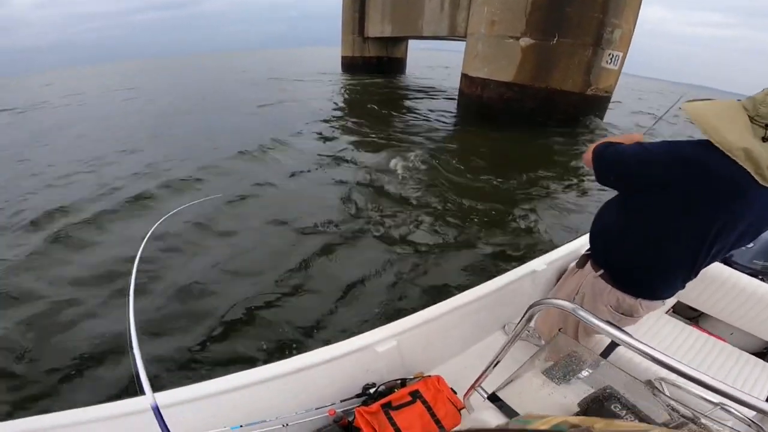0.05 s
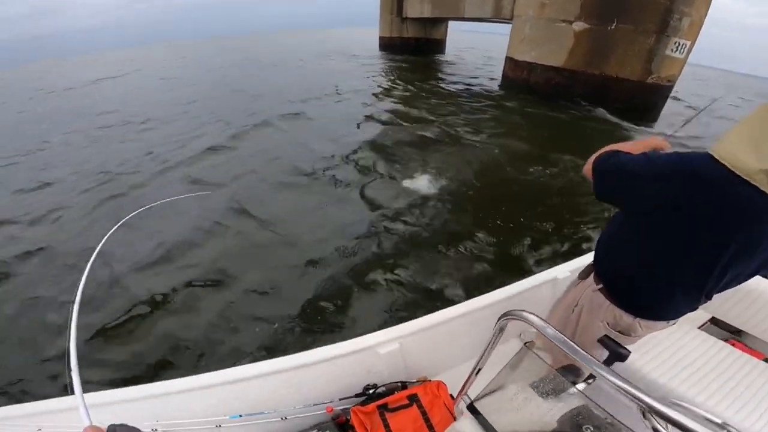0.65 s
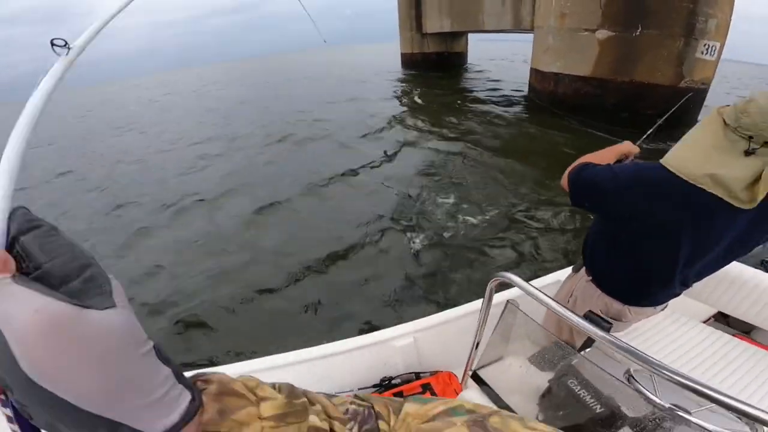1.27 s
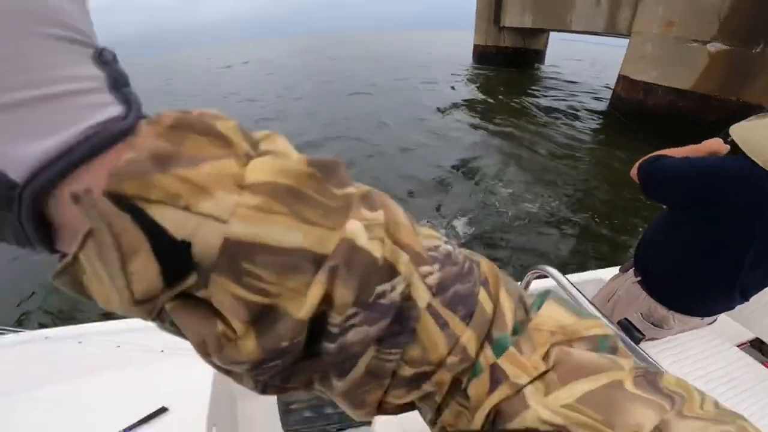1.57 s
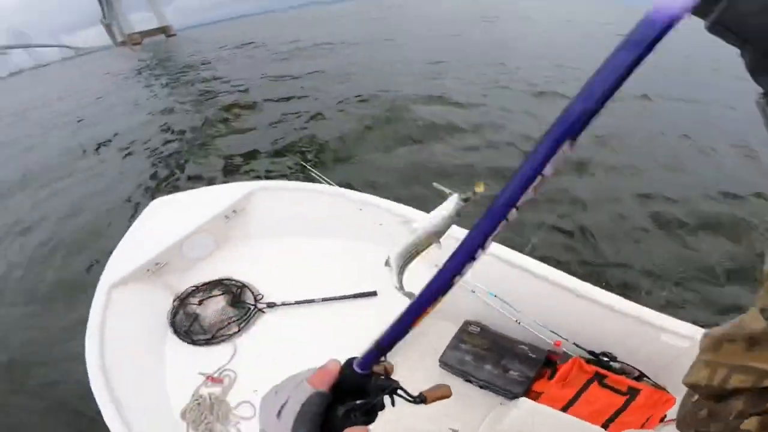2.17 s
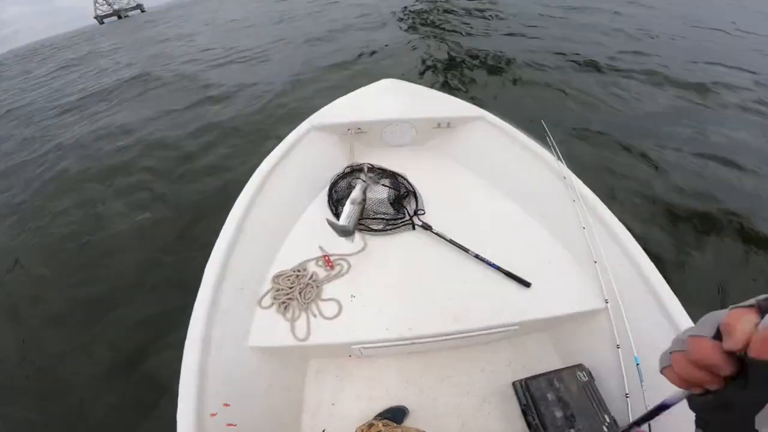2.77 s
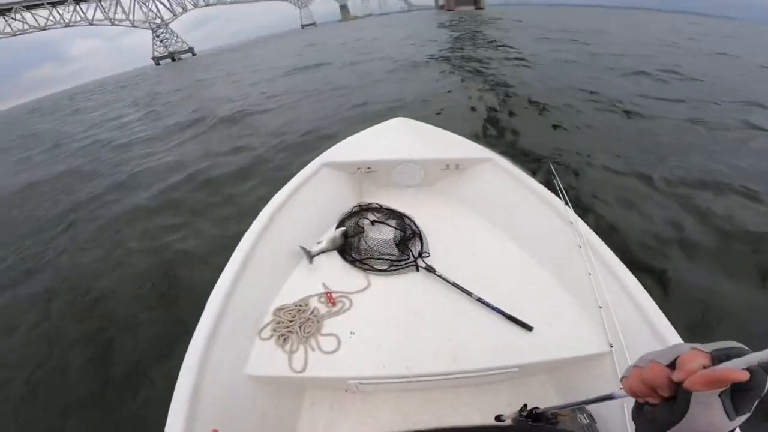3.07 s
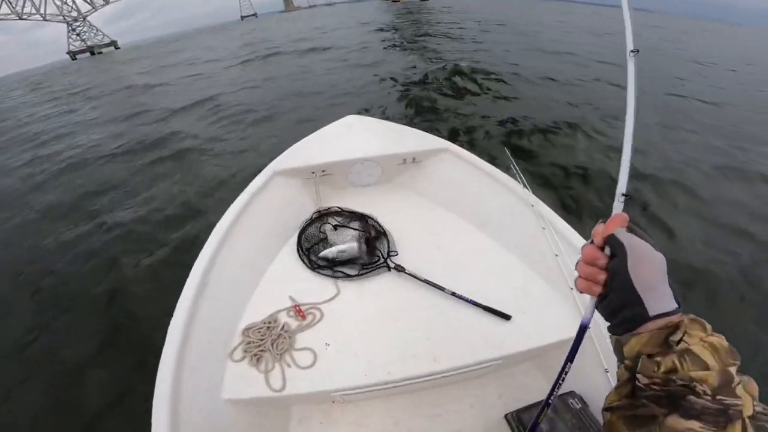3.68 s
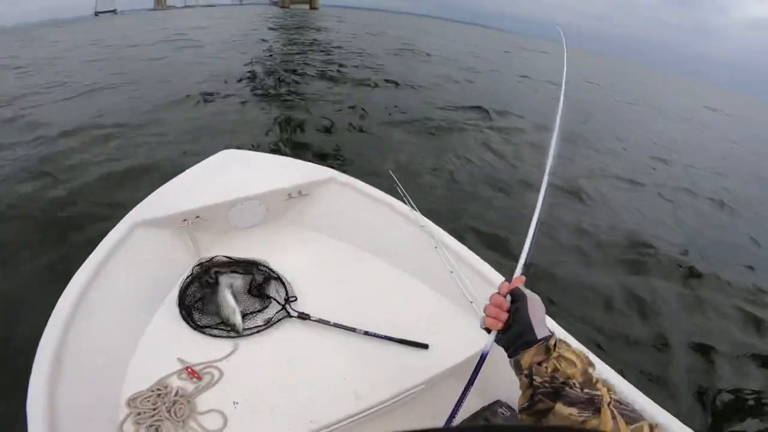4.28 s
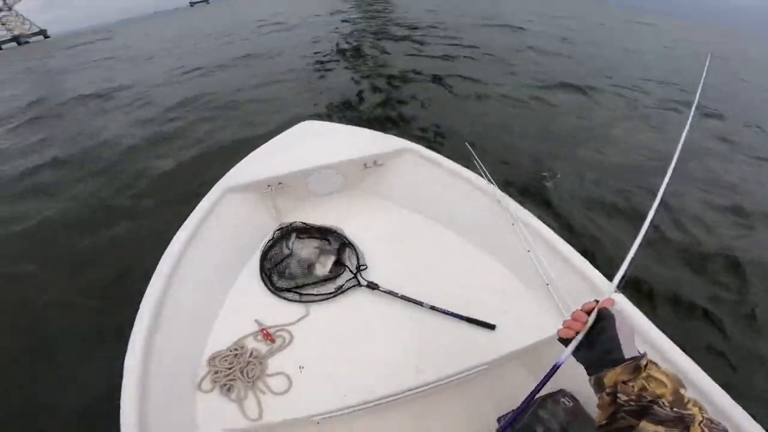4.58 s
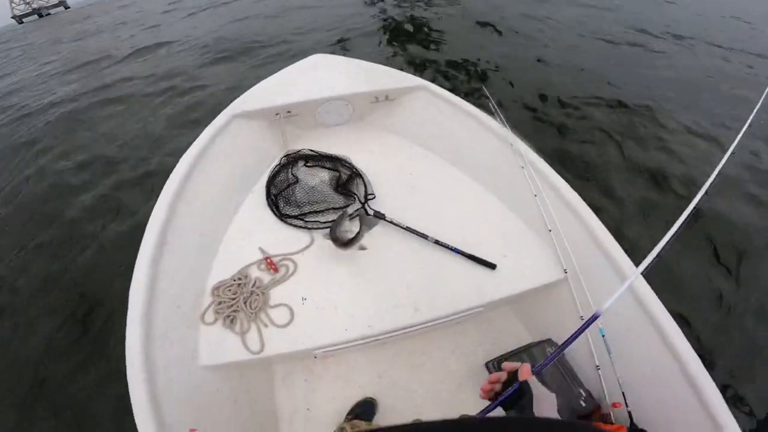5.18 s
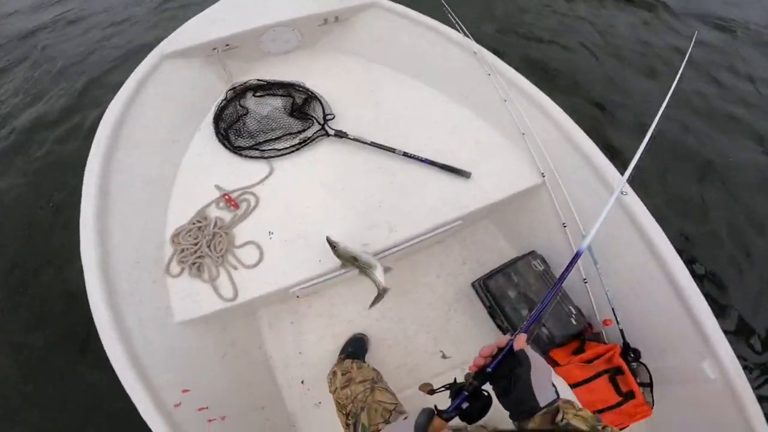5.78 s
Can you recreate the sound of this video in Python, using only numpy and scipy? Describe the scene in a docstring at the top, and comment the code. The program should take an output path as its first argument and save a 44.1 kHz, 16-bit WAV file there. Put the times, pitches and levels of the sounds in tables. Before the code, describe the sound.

A hooked fish splashes lightly, then slaps and knocks on a boat deck under gusty wind and washing water.

```python
"""Wind rumbles on a body-worn microphone while choppy water washes around a small fibreglass boat.
An angler reels in with rustling sleeves as the hooked fish splashes, then swings it aboard.
It flaps on the hollow foredeck: its wet skin slaps, and its weight makes the deck knock dully.
The steel lure tinkles and the landing net scrapes on the scales. Under the wind, a faint low drone
swells once and a thin hum sets in later."""
import sys
import numpy as np
from scipy import signal
from scipy.fft import rfft, irfft, next_fast_len
from scipy.io import wavfile
from scipy.ndimage import uniform_filter1d, map_coordinates

SR = 44100
rng = np.random.default_rng(int(sys.argv[2]) if len(sys.argv) > 2 else 0)


def bounce(signal):
    """Save signal as a 16-bit WAV file at the path given by the first command-line argument."""
    frames = np.transpose(np.atleast_2d(signal))
    limited = np.clip(frames, -1, 1)
    pcm = np.round(limited * 32767).astype(np.int16)
    wavfile.write(sys.argv[1], SR, pcm)


N = 261954

# the tone of rustling cloth and spattering water: (frequency [Hz], level [dB])
RUSTLE_TONE = [(500, -40), (1300, 2), (2300, 4.5), (3500, -4.5), (5000, -7.5), (7000, -14.5), (9000, -24),
               (10500, -30.5), (15000, -50)]


def amp(db):
    """Turn decibels into a number to multiply a sound by."""
    return 10 ** (np.asarray(db) / 20)


def unit(x):
    """Scale a signal to an average (rms) strength of 1."""
    return x / np.sqrt(np.mean(x ** 2) + 1e-20)


def steady(x):
    """Even out the slow swells of a noise."""
    return x / np.sqrt(np.abs(uniform_filter1d(x ** 2, size=4500)) + 1e-6)


def along(points, hz):
    """Read between (frequency [Hz], value) points, giving each octave equal room."""
    frequencies, values = np.transpose(points)
    return np.interp(np.log(hz + 1), np.log(frequencies + 1), values)


def curve(points):
    """Join (time [s], value) points with straight lines, one value a sample."""
    return np.interp(np.arange(N) / SR, *np.transpose(points))


def stretch(points):
    """A volume that follows (time [s], level [dB]) points and is silent before and after them."""
    t = np.arange(N) / SR
    sounding = 1. * ((t >= points[0][0]) & (t <= points[-1][0]))
    return amp(curve(points)) * uniform_filter1d(sounding, size=900)


def hump(s, length):
    """A smooth rise to 1 at time s and back, about length seconds wide."""
    return np.exp(-(2 * (np.arange(N) / SR - s) / length) ** 2)


def swell(t, rise, t60):
    """Contact spreads until t = 0, then the sound fades by 60 dB every t60 seconds."""
    growth = np.exp(-(np.minimum(t, 0) / max(rise, .0002)) ** 2)
    return growth * amp(-60 * np.maximum(t, 0) / max(t60, .003))


def wobble(rate):
    """A smooth curve through rate random values a second."""
    return map_coordinates(rng.standard_normal(8192), [np.arange(N) * rate / SR + 2], mode="mirror")


def add(track, s, sound):
    """Mix a sound into a track at s seconds."""
    part = track[max(round(s * SR), 0):][:len(sound)]
    part += sound[:len(part)]


def filtered(x, response):
    """Multiply each frequency in x by response(hz)."""
    size = next_fast_len(len(x) + 8192)
    return irfft(rfft(x, size) * response(np.fft.rfftfreq(size, 1 / SR)), size)[:len(x)]


def coloured(x, tone):
    """Give x a (frequency [Hz], level [dB]) tone that falls away above its last point; strength 1."""
    return unit(filtered(x, lambda hz: amp(along(tone, hz)) / (1 + (hz / tone[-1][0]) ** 4)))


def rush(tone, patchy_db):
    """Rushing noise with random louder and softer patches across pitch and time."""
    spectra = signal.stft(rng.standard_normal(N), nperseg=512)[2]
    patches = uniform_filter1d(rng.standard_normal(spectra.shape), size=5, axis=0)
    patches = unit(uniform_filter1d(patches, size=10, axis=1))
    noise = signal.istft(spectra * amp(patchy_db * patches), nperseg=512)[1][:N]
    return coloured(noise, tone)


def grains(rate, spread_db):
    """Tiny random clicks of uneven size, about rate of them a second."""
    pulses = (rng.random(N) < rate / SR) * rng.standard_normal(N)
    return pulses * amp(spread_db * np.minimum(rng.exponential(size=N), 4))


def bubbles(rate, hz, cycles, spread_db, octaves):
    """Rate bubbles a second; each rises in pitch and fades by 30 dB over the given cycles."""
    when, pitch, size = rng.random((int(rate * N / SR), 3)).T[:, :, None]
    samples = np.arange(1024)
    turns = hz * 2 ** (octaves * (pitch - .5)) * samples / SR
    age = turns / cycles
    size_db = spread_db * np.minimum(-np.log(1 - size), 3)
    volume = amp(size_db - 30 * age) * (1 - np.exp(-2 * turns))
    waves = volume * np.sin(2 * np.pi * turns * (1 + 0.073 * age))
    positions = (when * N).astype(int) + samples
    return unit(np.bincount(positions.ravel(), waves.ravel(), N)[:N])


def surges(source, rows, octaves):
    """Brief swells of a grainy sound, each narrowed to a band around its own pitch."""
    def band(centre):
        return unit(filtered(source, lambda hz: np.exp(-(np.log2((hz + 1) / centre) / octaves) ** 2)))
    return sum(amp(db) * hump(s, length) * band(centre) for s, length, db, centre in rows)


def ringing(modes, attack, scatter_db=4.0, detune=0.0088):
    """A struck object's own fading notes (modes), a little different in level and pitch each time."""
    t = np.arange(8192) / SR
    ring = np.zeros(len(t))
    for hz, db, t60 in modes:
        volume = amp(db + scatter_db * rng.normal() - 60 * t / t60)
        ring += volume * np.sin(2 * np.pi * hz * (1 + detune * rng.normal()) * t)
    return ring * (1 - np.exp(-t / attack))


def struck_at(modes, place_hz, boost_db=8, octaves=.08):
    """Each spot on the deck favours one pitch: notes near it come out stronger."""
    return [(hz, db + boost_db * np.exp(-(np.log2(hz / place_hz) / octaves) ** 2), t60)
            for hz, db, t60 in modes]


def drone_and_hum(hum_hz=419.4, hum_start_s=3.6):
    """Two faint sounds under the wind: a low drone that swells once, and later a thin wavering hum."""
    # the drone's tone: (frequency [Hz], level [dB])
    drone_tone = [(150, -34), (186, -9), (200, 6.5), (222, -23), (247, -2.5), (275, -6.5), (340, -41)]
    fade_in = np.clip((np.arange(N) / SR - hum_start_s) / 0.083, 0, 1)
    level_db = -46.5 + 2.5 * wobble(8)
    pitch_hz = hum_hz + 1.8 * wobble(25)
    hum = amp(level_db) * np.sin(2 * np.pi * np.cumsum(pitch_hz) / SR)
    drone = steady(coloured(rng.standard_normal(N), drone_tone))
    return fade_in * hum + amp(-33) * hump(2.42, length=1) * drone


def wind():
    """Big swirls of air push on the microphone; smaller ones buffet and flutter, more so in a gust."""
    # the wind's strength: (time [s], level [dB])
    strength = [(0, -23), (.22, -27), (.55, -28.5), (.72, -27), (1, -27), (1.35, -24.5), (1.8, -26.5),
                (2.1, -28.5), (2.42, -28.5), (2.72, -22.5), (3.2, -31.5), (3.85, -27.5), (4.2, -24.5),
                (4.5, -32), (4.85, -22), (5.05, -25.5), (5.45, -31), (5.94, -29)]
    # gusts: (peak time [s], length [s], rise in buffeting [dB])
    gusts = [(0.562, 0.081, 7.5), (1.807, 0.13, 6.5), (2.4, 0.38, 5.5), (2.822, 0.25, 6), (3.12, 0.28, 6),
             (3.402, 0.84, 5.5), (3.765, 0.14, 6.5), (4.21, 0.14, 5), (4.464, 0.25, 11.5),
             (4.707, 0.075, 10), (4.892, 0.067, 5.5), (5.073, 0.095, 8), (5.327, 0.26, 11)]
    # tones of big, middling and small swirls: (frequency [Hz], level [dB])
    push_tone = [(8, -31.5), (18, -5), (37, 0), (49, 5.5), (61, -17), (80, -10), (140, -64)]
    buffet_tone = [(35, -34), (58, 2), (80, 1), (115, -2), (145, -7.5), (210, -46.5)]
    flutter_tone = [(70, -8.5), (125, -1), (160, -1.5), (200, -2), (250, -8.5), (330, -11.5), (480, -20),
                    (900, -25)]
    wind_db = curve(strength)
    swing_db = wind_db - wind_db.mean()
    gust_db = sum(db * hump(s, length) for s, length, db in gusts)
    push = steady(rush(push_tone, patchy_db=-3.5))
    buffet = steady(rush(buffet_tone, patchy_db=-4.0))
    flutter = rush(flutter_tone, patchy_db=1.5)
    return (amp(wind_db - 0.5 * wobble(18)) * push
            + amp(-29.5 + 0.84 * swing_db + gust_db) * buffet
            + amp(-32 + swing_db + 0.4 * gust_db) * flutter)


def water():
    """Small waves wash and lap around the hull, full of ringing bubbles, under a thin hiss of spray."""
    # the strength of the choppy water: (time [s], level [dB])
    chop = [(0, -36.5), (.25, -37), (.55, -35.5), (1.03, -38), (1.3, -36), (1.75, -36.5), (2.07, -39.5),
            (2.4, -37.5), (2.7, -38), (3.05, -42), (3.33, -43.5), (3.65, -40.5), (4.2, -37.5), (4.5, -42.5),
            (5.4, -42.5), (5.94, -40)]
    # tones of the wash and the spray: (frequency [Hz], level [dB])
    wash_tone = [(150, -25), (300, -5.5), (500, -1.5), (800, -0.5), (1050, -2), (1400, -6.5), (2000, -13.5),
                 (3000, -29.5), (6000, -44.5)]
    spray_tone = [(900, -10.5), (2000, 2.5), (3000, -1.5), (4300, -5), (5500, -11.5), (8000, -18.5),
                  (10000, -25), (11000, -34.5), (15000, -47.5)]
    # waves lapping on the hull: (peak time [s], length [s], level [dB], pitch [Hz])
    laps = [(.15, 0.36, -40.5, 990), (0.497, 0.1, -36, 1170), (0.767, 0.21, -41, 1080),
            (1.2, 0.39, -46, 880), (2.327, 0.1, -41, 1300), (2.408, 0.66, -43, 870),
            (3.87, 0.067, -40.5, 1070)]
    chop_db = curve(chop)
    gurgle = .45 * bubbles(rate=130, hz=1000, cycles=16, spread_db=3, octaves=1.1)
    wash = amp(chop_db + 1.5 + 0.2 * wobble(25)) * unit(rush(wash_tone, patchy_db=0.7) + gurgle)
    spray = amp(-54 + 1.43 * (chop_db - chop_db.mean())) * rush(spray_tone, patchy_db=.8)
    slosh = bubbles(rate=600, hz=1050, cycles=16, spread_db=2, octaves=1.3)
    return wash + spray + surges(slosh, laps, octaves=.26)


def clicks():
    """Thin dry clicks far up in the treble, over a fine crackle."""
    # patches of crackle: (start [s], end [s], level [dB])
    crackles = [(2.81, 2.925, -75), (4.83, 4.93, -82)]
    # single clicks: (time [s], level [dB])
    snaps = [(2.832, -51), (2.848, -50), (2.87, -58), (2.891, -54), (2.902, -55), (4.838, -60),
             (4.913, -47), (4.918, -40), (4.923, -54)]
    volume = sum(stretch([(start, db), (end, db)]) for start, end, db in crackles)
    track = volume * unit(grains(rate=500, spread_db=1))
    for s, db in snaps:
        add(track, s, amp(db) * np.array([1, -.5]))
    return track


def splashes():
    """The hooked fish thrashes and throws up spurts of hiss and tiny bubbles."""
    # spurts of water: (peak time [s], length [s], level [dB], pitch [Hz])
    spurts = [(0.312, 0.049, -55, 7160), (0.435, 0.019, -47, 5560), (0.462, 0.017, -53, 7400),
              (0.52, 0.02, -59, 8100), (0.634, 0.048, -43, 2600), (0.784, 0.083, -46, 4280),
              (0.844, .06, -60, 7050), (1.14, 0.057, -46, 2380), (1.228, .03, -50, 4600),
              (1.305, 0.025, -47, 5200), (1.42, 0.022, -58, 8260), (1.462, .025, -49, 4600),
              (1.525, 0.044, -49.5, 4760), (1.6, 0.26, -59.5, 7700), (1.62, 0.12, -45, 3770),
              (1.82, .14, -59.5, 5670)]
    hiss = rng.standard_normal(N)
    fizz = 1.3 * bubbles(rate=1200, hz=5000, cycles=18, spread_db=1.6, octaves=2)
    return surges(hiss + fizz, spurts, octaves=.32)


def drops():
    """Each drop lands with a splat and leaves a bubble that rings briefly and rises in pitch."""
    # drops thrown up by the hooked fish: (time [s], level [dB], starting pitch [Hz])
    landings = [(0.352, -35, 3400), (.645, -38, 2700), (.777, -37, 4850), (0.86, -36, 3660),
                (1.135, -33, 2260), (1.223, -37, 2350), (1.315, -39, 3300)]
    track, t = np.zeros(N), np.arange(SR // 20) / SR
    soft_start = np.sin(np.pi / 2 * np.minimum(t / .0015, 1)) ** 2
    volume = soft_start * swell(t - .002, rise=0.003, t60=.021)
    for s, db, hz in landings:
        splat = amp(-6) * coloured(rng.standard_normal(len(t)), RUSTLE_TONE)
        bubble = np.sin(2 * np.pi * hz * t * (1 + 2.5 * t))
        add(track, s, amp(db) * (bubble + splat) * volume)
    return track


def reeling():
    """Sleeves and reel rub in many tiny slips while the hooked fish spatters water in clumps."""
    # the loudness of winding in: (time [s], level [dB])
    winding = [(0, -50.5), (.4, -46.5), (.8, -43), (.95, -45.5), (1.38, -47), (1.6, -44.5), (1.87, -46),
               (1.96, -50)]
    cloth = rush(RUSTLE_TONE, patchy_db=1.5)
    slips = .7 * coloured(grains(rate=280, spread_db=2.2), RUSTLE_TONE)
    clumps = .55 * amp(1.5 * wobble(22))
    spatter = coloured(bubbles(rate=260, hz=5200, cycles=11, spread_db=2, octaves=1.8), RUSTLE_TONE)
    return amp(1.2 * wobble(35)) * stretch(winding) * unit(cloth + slips + clumps * spatter)


def sliding():
    """The wet fish slides over the deck and net, and the mesh scrapes on its scales."""
    # slides: (start [s], end [s], starting level [dB], ending level [dB])
    slides = [(2.798, 2.964, -40.5, -62.5), (3.9, 4.23, -63.5, -46.5), (4.497, 4.583, -57, -68),
              (4.675, 4.782, -53.5, -51.5), (5, 5.16, -49.5, -61), (5.587, 5.728, -59, -52)]
    # the tone of mesh on scales: (frequency [Hz], level [dB])
    scrape_tone = [(900, -20), (2000, 2), (2700, -2), (3700, -2.5), (4500, -6.5), (5400, -10.5),
                   (8000, -27), (10000, -28), (15000, -45)]
    hiss = rush(scrape_tone, patchy_db=1.5)
    slips = coloured(grains(rate=350, spread_db=1.5), scrape_tone)
    squelch = .8 * coloured(bubbles(rate=300, hz=3800, cycles=10, spread_db=2.5, octaves=1.2), scrape_tone)
    volume = sum(stretch([(start, first_db), (end, last_db)]) for start, end, first_db, last_db in slides)
    return amp(0.76 * wobble(68)) * volume * unit(hiss + slips + squelch)


def wriggles():
    """Wet scales catch on the mesh in quick runs of tiny slips."""
    # short wriggles: (peak time [s], length [s], level [dB], pitch [Hz])
    runs = [(2.858, 0.083, -62, 6900), (3.07, 0.06, -67, 7300), (2.933, .03, -63, 6500),
            (3.21, 0.012, -53, 7000), (3.256, 0.014, -50, 6000), (3.533, 0.018, -51, 6000),
            (3.991, .012, -58.5, 7260), (4.21, 0.052, -58, 7460), (4.253, 0.031, -54, 7400),
            (4.461, .02, -54.5, 6960), (4.677, .035, -64, 6960), (4.73, 0.044, -59, 3660),
            (5.029, 0.057, -63, 6400), (5.08, .02, -68, 6860), (5.123, 0.038, -55, 3800),
            (5.456, 0.023, -55, 4600), (5.531, .02, -63, 7800), (5.61, .04, -65, 7400),
            (5.68, 0.051, -60.5, 6900)]
    slips = .7 * rng.standard_normal(N) + unit(grains(rate=700, spread_db=1.2))
    return surges(slips, runs, octaves=.42)


def lure():
    """The steel lure touches metal and tinkles faintly."""
    # touches: (time [s], level [dB])
    touches = [(2.924, -57), (2.984, -63), (3.012, -50), (3.021, -59), (3.053, -53)]
    # the lure's own notes: (pitch [Hz], level [dB], time to fade by 60 dB [s])
    steel_modes = [(6293, 0, .075), (7990, -12, .1), (8812, -10, .07), (11886, -14, .065),
                   (12107, -14, .07)]
    track = np.zeros(N)
    for s, db in touches:
        add(track, s, amp(db) * ringing(steel_modes, attack=0.004, scatter_db=3, detune=.004))
    return track


def add_smack(track, s, db, rise, t60, weight_db, edge_db):
    """Mix in a crackly burst that peaks at time s; weight lifts its middle pitches, edge its treble."""
    # the tone of wet skin hitting the deck: (frequency [Hz], level [dB])
    skin_tone = [(250, -40), (600, 6.5), (1200, 2.5), (2100, 4.5), (3000, -1), (4000, 5), (5200, -1),
                 (7000, -6), (9300, -13.5), (10500, -24), (12300, -26), (13200, -36.5), (14800, -39),
                 (16000, -48.5)]
    t = np.arange(-4096, 4096) / SR
    noise = rng.standard_normal(len(t))
    roughness_db = -unit(uniform_filter1d(rng.standard_normal(len(t)), size=30))
    tilt = [(700, weight_db / 2), (2200, weight_db), (3800, 0.006), (7000, edge_db)]
    crackle = filtered(noise * amp(roughness_db), lambda hz: amp(along(tilt, hz)))
    add(track, s + t[0], amp(db) * coloured(crackle, skin_tone) * swell(t, rise, t60))


def ticks():
    """Reel, tackle and net give small, light ticks."""
    # light contacts: (time [s], level [dB])
    taps = [(0.423, -32.5), (0.464, -38), (1.029, -29.5), (1.039, -36.5), (1.456, -31), (1.587, -31.5),
            (1.601, -30), (4.532, -40.5), (4.555, -40), (4.623, -47), (4.674, -45), (4.696, -38),
            (4.728, -52), (4.798, -48), (4.99, -47), (5.01, -43), (5.028, -40.5), (5.054, -44),
            (5.079, -39.5), (5.107, -56), (5.528, -50)]
    track = np.zeros(N)
    for s, db in taps:
        add_smack(track, s, db, rise=0.00039, t60=.028, weight_db=8.0, edge_db=1.5)
    return track


def knocks():
    """Blows ring the hollow deck; hard ones reach its upper notes, and a fish lying on it damps them."""
    # blows: (time [s], level [dB], upper-note lift [dB], favoured pitch [Hz], ring length [factor])
    blows = [(0.595, -26.5, -6, 415, 0.76), (0.622, -27, 10, 415, 1), (2.7565, -17, 2, 340, 0.81),
             (2.776, -19, -7, 337, 0.65), (2.886, -22, -8, 520, .8), (2.948, -28.5, 6, 415, 0.94),
             (3.452, -24.5, 6, 634, 0.92), (3.554, -20, -2, 850, 0.86), (3.709, -23, -7, 303, 0.87),
             (4.004, -22.5, -1.5, 536, 1), (4.179, -19, -2, 866, 2.1), (4.2557, -13.5, -10.5, 333, 2),
             (4.4065, -10, -11.5, 323, 1.16), (4.42, -20, -12, 290, 2.2), (4.445, -25, -13, 325, 2.1),
             (4.778, -24, -15, 305, 1.2), (4.826, -24, -10, 300, 1.7), (4.872, -26, -4, 415, 1.3),
             (4.902, -21.5, -11, 340, 1.3), (5.059, -26, 0.5, 415, 1), (5.29, -28, -9, 337, 1.2),
             (5.355, -28, -11, 290, 1)]
    # the deck panel's own notes: (pitch [Hz], level [dB], time to fade by 60 dB [s])
    deck_modes = [(265, -23, 0.083), (288.5, -6.5, 0.037), (327, -0.5, 0.024), (414.6, -10.5, 0.074),
                  (527, -20.5, 0.053), (651, -19.5, 0.034), (845, -23, 0.035)]
    # the hull's rumble after a knock: (frequency [Hz], level [dB])
    rumble_tone = [(80, -43), (200, -34), (330, -9.5), (450, 6.5), (700, 1.5), (1100, -32), (2500, -50)]
    track = np.zeros(N)
    for s, db, upper_db, place_hz, sustain in blows:
        modes = [(hz, level + (hz > 450) * (upper_db + 16), t60 * sustain)
                 for hz, level, t60 in struck_at(deck_modes, place_hz)]
        ring = ringing(modes, attack=0.005, scatter_db=0.5)
        t = np.arange(len(ring)) / SR
        rumble = coloured(rng.standard_normal(len(t)), rumble_tone)
        rumble *= swell(t - .002, rise=0.0003, t60=.33)
        add(track, s, amp(db) * (ring / np.abs(ring).max() + amp(-27) * rumble))
    return track


def slaps():
    """Fin, wet body and tail smack the deck in turn, and its hard shell clacks."""
    # flaps: (time [s], level [dB], weight [dB], edge [dB], time to fade by 60 dB [s], favoured pitch [Hz])
    flaps = [(2.564, -35, -2.5, -10.5, 0.061, 2470), (2.7557, -29, 13, -1, 0.026, 1270),
             (2.7665, -23, 10, -2, 0.0204, 2470), (2.7706, -22, 13, -0.5, 0.051, 1950),
             (2.79, -42, 2, -13, .09, 4130), (2.847, -42, 9, -6, 0.084, 4150),
             (2.887, -49, 2, 5, 0.046, 1950), (3.219, -34.5, -2, -1, 0.07, 2700),
             (3.227, -36.5, -12, 2, 0.028, 4130), (3.2617, -25.5, -11, -7, .013, 3450),
             (3.267, -41, -6, 10, 0.038, 3750), (3.312, -50, 5, 6, 0.039, 4130),
             (3.541, -24, 0, -5.5, 0.016, 3750), (3.5522, -30.5, -2, -11, 0.038, 2680),
             (3.601, -39.5, -1, -8, 0.04, 3750), (3.899, -25, 4, -8, 0.012, 2170),
             (3.9038, -33.5, -7, 5, 0.008, 2470), (4.004, -37, 5, -3, 0.04, 3750),
             (4.1691, -28.5, 7, 9, 0.025, 1950), (4.1724, -31.5, 11, 5, 0.088, 1950),
             (4.249, -29.5, 6, 4, 0.031, 4480), (4.256, -27.5, -6, -3, 0.054, 3450),
             (4.398, -45, -5, 4, 0.082, 4480), (4.407, -39, -4, 4, 0.04, 4130),
             (4.45, -37.5, 10, 3.5, 0.07, 1950), (4.646, -43, 8, 0, 0.04, 2150),
             (4.77, -39.5, 13, 8, 0.035, 2490), (5.388, -41.5, 4, 5, 0.1, 2170),
             (5.397, -34, -1.5, 6, 0.034, 4480), (5.456, -46.5, -1, -4, 0.068, 4130),
             (5.692, -42.5, 1, -4, 0.064, 3750), (5.8125, -27.5, 4, 10, 0.026, 2170)]
    # the shell's own notes: (pitch [Hz], level [dB], time to fade by 60 dB [s])
    shell_modes = [(1270, -6, .05), (1950, -1.5, .045), (2170, -2, .045), (2470, 0, .05), (2700, 2, .05),
                   (3450, -3, .035), (3750, -4, .035), (4130, -2, .045), (4480, -3, .04)]
    track = np.zeros(N)
    for s, db, weight_db, edge_db, t60, place_hz in flaps:
        fin, body, tail = (s - .16 * t60, db - 18), (s, db), (s + .15 * t60, db - 7.5)
        for contact_s, contact_db in (fin, body, tail):
            add_smack(track, contact_s, contact_db, .033 * t60, t60, weight_db, edge_db)
        add_smack(track, s, db + 2, 0, .007, weight_db, edge_db)  # the sharp snap as the body hits
        longest_ring_s = 1.3 * t60  # the fish damps the shell
        modes = [(hz, level, min(ring_s, longest_ring_s))
                 for hz, level, ring_s in struck_at(shell_modes, place_hz)]
        clack = ringing(modes, attack=.0004, detune=.02)
        add(track, s, amp(db - 11.5 + .2 * weight_db) * clack)
    return track


def hull_echoes(x):
    """Sound bounces between the sides of the boat; the treble dies away first."""
    # how long the echoes last: (frequency [Hz], time to fade by 60 dB [s])
    fade_times = [(200, 1), (2000, 0.21), (10000, 0.12)]
    hz, t, spectra = signal.stft(rng.standard_normal(SR // 3), SR, nperseg=256)
    fade = amp(-60 * t / along(fade_times, hz)[:, None])
    tail = signal.istft(spectra * fade, SR, nperseg=256)[1]
    return signal.fftconvolve(x, np.pad(tail, (150, 0)) / np.linalg.norm(tail))[:N]


def scene():
    """The fish is reeled in and flaps on deck, amid wind and water."""
    hits = slaps() + ticks() + knocks() + lure()
    struggle = drops() + reeling() + sliding() + wriggles() + splashes()
    background = clicks() + water() + wind() + drone_and_hum()
    return (hits + amp(-14.0) * hull_echoes(hits) + struggle + background)[None]


def record(dry, top_hz=15600):
    """Cut away the very highest treble."""
    return filtered(dry[0], lambda hz: hz < top_hz)[None]


dry = scene()
out = record(dry)
bounce(out)
```